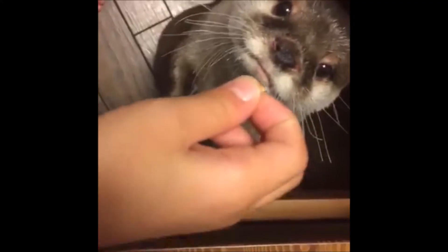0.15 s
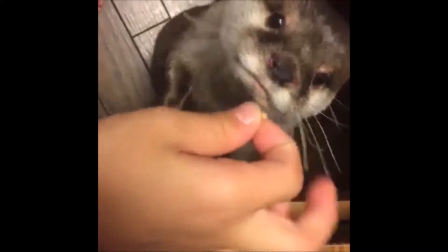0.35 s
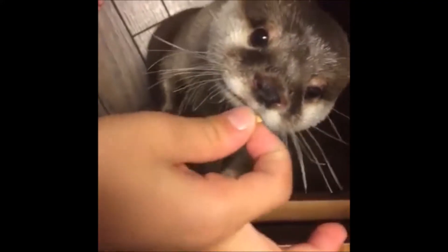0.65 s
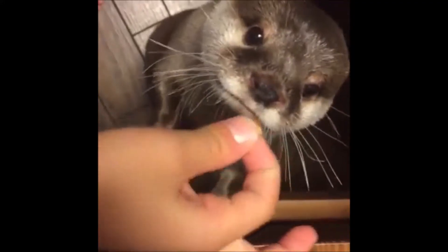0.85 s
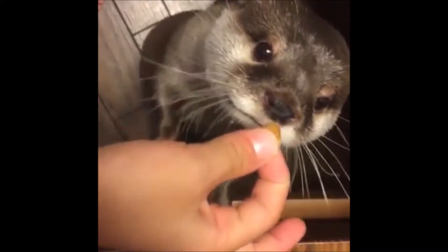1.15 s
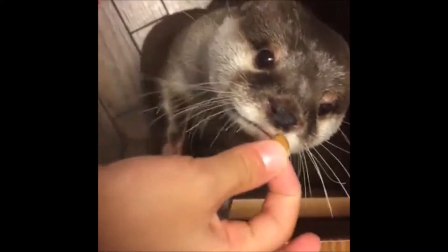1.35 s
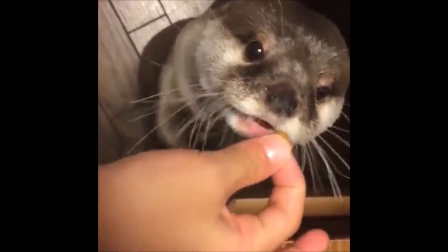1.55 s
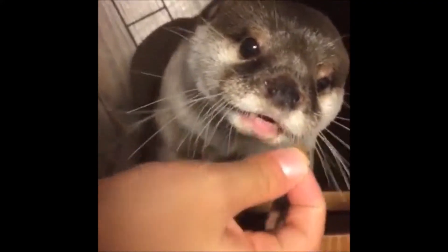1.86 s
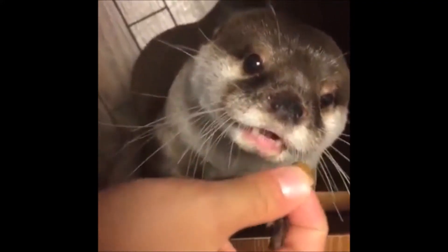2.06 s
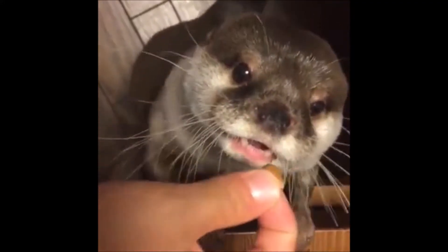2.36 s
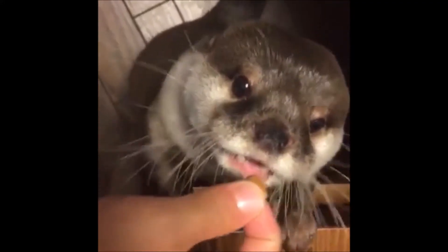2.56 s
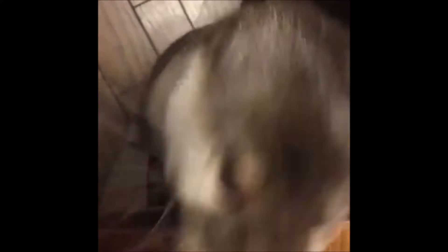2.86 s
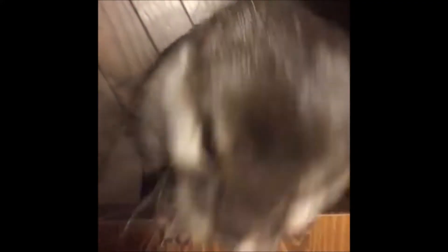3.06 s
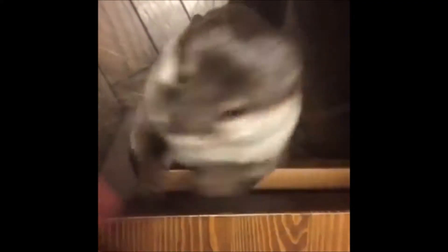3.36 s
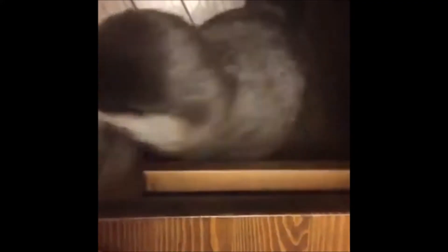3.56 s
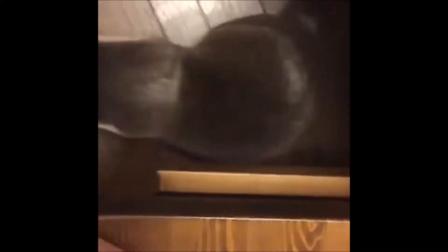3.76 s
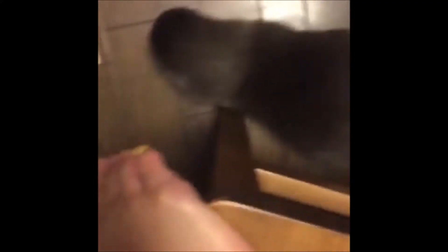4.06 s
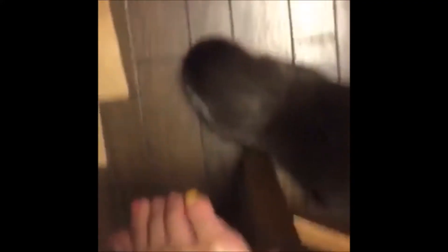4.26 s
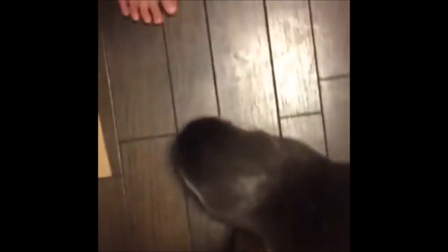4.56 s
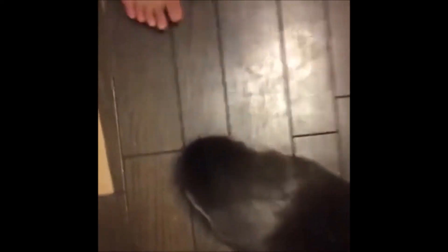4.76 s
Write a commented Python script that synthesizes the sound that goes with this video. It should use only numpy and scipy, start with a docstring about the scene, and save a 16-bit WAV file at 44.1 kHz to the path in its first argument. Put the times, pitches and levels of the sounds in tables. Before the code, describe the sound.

Over a faint indoor hum, close shrill otter calls break upward into a hoarse scream with paw thuds, ending in a low nasal grumble.

```python
"""Over a quiet hum, an earlier cry of a pet otter is dying away in a small room with a wooden floor.
The otter sniffs a morsel three times: short draughts of noise. Then it begs close to a phone: a wavering
cry breaks upward into a whine, a hoarse scream with paw thuds, and a wail, all pulses of the vocal folds
coloured by throat and mouth. A thin whistle joins the cry and the scream, and low lumps of air rumble.
Last, it walks off with a low nasal grumble and one more paw thud. The room rings a little."""
import sys
import numpy as np
from scipy import signal
from scipy.fft import rfft, irfft, next_fast_len
from scipy.io import wavfile
from scipy.ndimage import uniform_filter1d

SR = 44100
rng = np.random.default_rng(int(sys.argv[2]) if len(sys.argv) > 2 else 0)


def materialize(psi):
    """Save the field psi as 16-bit PCM at rate SR to the path in sys.argv[1].

    A 1-D psi becomes a single channel; in a 2-D psi each row is a channel.
    """
    bounded = np.clip(np.atleast_2d(psi).T, -1, 1)
    quanta = np.round(bounded * 32767).astype(np.int16)
    wavfile.write(sys.argv[1], SR, quanta)


N = 216220
TIME = np.arange(N) / SR  # [s]
EDGE_HZ = 14600  # upper limit of the sound


def amp(db):
    """Turns decibels into a gain."""
    return 10 ** (np.asarray(db) / 20)


def unit(x):
    """Scales a sound to an average strength (rms) of 1."""
    return x / np.sqrt(np.mean(x ** 2) + 1e-20)


def read(points, hz):
    """Reads a curve between its points, on a logarithmic frequency axis."""
    point_hz, value = np.transpose(points)
    return np.interp(np.log(hz + 1), np.log(point_hz + 1), value)


def follow(rows, t):
    """Reads every column of a curve at the times t."""
    s, *columns = np.transpose(rows)
    return [np.interp(t, s, column) for column in columns]


def add(mix, s, sound):
    """Mixes a sound in at time s, cutting what runs past the end."""
    part = mix[max(round(s * SR), 0):][:len(sound)]
    part += sound[:len(part)]


def shape(x, gain):
    """Filters by gain, a function of frequency."""
    size = next_fast_len(len(x) + 4096)
    spectrum = rfft(x, size) * gain(np.fft.rfftfreq(size, 1 / SR))
    return irfft(spectrum, size)[:len(x)]


def wander(count, hz):
    """Random drift of rms 1 that moves mostly slower than hz."""
    drift = shape(rng.standard_normal(N), lambda f: 1 / (1 + (f / hz) ** 4))
    return unit(drift[:count])


def resonate(x, hz, width):
    """A resonance of gain 1 whose centre follows the curve hz."""
    turn = np.exp(2j * np.pi * np.cumsum(hz) / SR)
    r = np.exp(-np.pi * width / SR)
    # shift the centre down to zero, smooth there, and shift back
    smooth = signal.lfilter([1 - r], [1, -r], x / turn)
    return 2 * (turn * smooth).real


def steady(x, size=700):
    """Holds the running rms near 1."""
    power = uniform_filter1d(uniform_filter1d(x ** 2, size), size)
    return x / np.sqrt(abs(power) + 1e-12)


# colour of the room noise: (frequency [Hz], relative level [dB])
ROOM_NOISE = [(15, -71.5), (25, -21.5), (101, -4), (167, -11.5), (237, -10), (427, -19.5), (488, -25.5),
              (573, -17.5), (769, -24), (1060, -21.5), (1960, -33.5), (3180, -36), (7480, -42.5),
              (12100, -48), (15000, -62)]
# steady tones of the hum: (frequency [Hz], relative level [dB])
HUM_TONES = [(102.3, -73), (532.9, -78.5), (581.4, -76)]


def background(start=0.044, noise_db=-59, hum_gain_db=3.5):
    """Low room noise with the wavering hum of a household appliance; both begin at start."""
    noise = unit(shape(rng.standard_normal(N), lambda f: amp(read(ROOM_NOISE, f))))
    noise = noise * amp(noise_db + 0.42 * wander(N, 11))
    hum = np.zeros(N)
    for hz, db in HUM_TONES:
        phase = 2 * np.pi * hz * TIME + 0.75 * wander(N, 1.9)
        hum += amp(db + hum_gain_db) * np.sqrt(2) * np.sin(phase)
    return (noise + hum) * (TIME > start)


# partials of an earlier cry: (frequency [Hz], relative level [dB], time to fade by 60 dB [s], capped below)
EARLIER_CRY = [(915, -7, 0.35), (1390, -13, 0.5), (1870, 3, 0.33), (2300, 3.5, 0.44), (3170, -13, 0.67),
               (3820, -18, 0.35), (4150, -12, 0.74), (5120, -11, 0.35), (6050, -6, 0.35), (6980, -10, 0.3)]


def echo(start=.052, ring_db=-50, haze_db=-57, longest_t60=0.47 + .14, haze_t60=0.47):
    """The partials and hiss of an earlier cry fade in the room, none outlasting the room itself."""
    t, first = TIME[:SR], SR // 20  # levels are set over the first twentieth of a second
    ring = np.zeros(SR)
    for hz, db, t60 in EARLIER_CRY:
        fade = amp(db - 60 * t / min(t60, longest_t60))
        tone = np.sin(2 * np.pi * (hz * t + rng.random()))
        ring += fade * tone * (1 + .5 * wander(SR, 44))
    haze = shape(rng.standard_normal(SR),
                 lambda f: amp(read(CRY_COLOUR, f)) * f / np.hypot(f, 5000))
    haze = haze * amp(-60 * t / haze_t60)
    out = np.zeros(N)
    add(out, start, amp(ring_db) * ring / ring[:first].std())
    add(out, start, amp(haze_db) * haze / haze[:first].std())
    return out


# air stirred by the lunge and the moving hand: (time [s], length [s], level [dB])
AIR_LUMPS = [(3.066, 0.073, -51.5), (4.057, 0.72, -59)]


def buffet(top_hz=45):
    """Stirred air rumbles on the microphone as soft lumps of low pressure."""
    out = np.zeros(N)
    for s, length, db in AIR_LUMPS:
        count = int(length * SR)
        add(out, s, amp(db) * wander(count, top_hz) * signal.windows.tukey(count, .4))
    return out


# paws landing on the wooden step: (time [s], peak level [dB])
PAW_LANDINGS = [(3.069, -45), (3.167, -42.5), (3.238, -33), (3.274, -39), (4.653, -48)]
# ways the wood rings: (frequency [Hz], relative level [dB], time to fade by 60 dB [s])
WOOD_RINGS = [(190, -25.5, 0.12), (320, 0.5, 0.13), (377, 12, 0.026), (440, -7.5, 0.017)]


def paws():
    """Soft pads thud on the wood: a short scuff of noise sets off its fading tones."""
    out, t = np.zeros(N), TIME[:SR // 8]
    wood = sum(amp(db - 60 * t / t60) * np.sin(2 * np.pi * hz * t) for hz, db, t60 in WOOD_RINGS)
    for s, db in PAW_LANDINGS:
        scuff = rng.standard_normal(len(t)) * np.exp(-t / 0.018)
        thud = signal.fftconvolve(scuff, wood)
        add(out, s, amp(db) * thud / abs(thud).max())
    return out


# how long the room rings: (frequency [Hz], time to fade by 60 dB [s])
ROOM_FADE = [(150, 0.38), (800, 0.57), (2500, 0.64), (6000, 0.74), (14000, 0.35)]


def room(x, tail_db, early_db):
    """Furniture scatters the short waves first; then a tail dies band by band."""
    # sparse random clicks, faded separately in each band, make the tail
    taps = rng.choice([-1., 1.], SR) * (rng.random(SR) < 4000 / SR) * (TIME[:SR] > .008)
    hz, t, bands = signal.stft(taps, SR, nperseg=256)
    fade = amp(-60 * t / read(ROOM_FADE, hz)[:, None])
    tail = signal.istft(bands * fade, SR, nperseg=256)[1]
    early = np.zeros(len(tail))
    early_s = rng.uniform(.002, .014, size=8)
    early[(early_s * SR).astype(int)] = rng.choice([-1., 1.], size=8)
    response = amp(tail_db) * tail / np.linalg.norm(tail)
    response = response + amp(early_db) * early / np.linalg.norm(early)
    reflected = signal.fftconvolve(x, response)[:N]
    return x + shape(reflected, lambda f: f / np.hypot(f, 900))  # less bass comes back


# sniffs at the food: (time [s], length [s], level before the room mix [dB])
SNIFF_TIMES = [(0.732, 0.13, -48.5), (1.091, 0.095, -59), (1.393, 0.082, -56)]
# colour of the nose: (frequency [Hz], relative level [dB])
NOSE_COLOUR = [(710, -25), (1200, -7), (1490, -12), (2010, -8.5), (2700, -19), (3990, -13.5), (5900, -19),
               (8640, -12.5), (13000, -18), (14000, -15.5)]


def sniffs():
    """Short soft draughts through the otter's nose: coloured noise that swells and sinks."""
    out = np.zeros(N)
    for s, length, db in SNIFF_TIMES:
        air = unit(shape(rng.standard_normal(N), lambda f: amp(read(NOSE_COLOUR, f))))
        count = int(length * SR)
        add(out, s, amp(db) * air[:count] * np.hanning(count))
    return out


# the voice strains or slackens: (time [s], half length [s], added roughness [0-1], effort [dB],
# bass [dB], treble [dB])
VOICE_STRAINS = [(1.68, .035, .85, 4, 7, -7), (1.95, .06, 0, 3, 0, -2.5), (2.15, .055, .55, 0, -1.5, -1),
                 (2.24, .025, 0, 0, -2, -5), (2.34, .05, 0, 2, -2, 1), (2.715, .025, 0, 4, 0, -4),
                 (2.79, .035, .25, -1, 1, 5), (2.92, .05, .5, 0, 0, 0), (3.064, .012, .3, 8, 7, -9),
                 (3.14, .05, .5, 1, -1, 7), (3.22, .018, .2, -4, -2, 0), (3.27, .022, .9, 3, -1, 0),
                 (3.345, .035, 0, 4, 3, -4), (3.51, .035, .5, 6, -1, -6), (3.84, .1, .35, -1, -3, 3),
                 (4.07, .05, 0, 4, 0, 0), (4.61, .09, .4, -4, -5, 6)]


def strain(t):
    """Roughness, effort, bass and treble that each passing strain adds, as smooth bumps in time."""
    return sum(np.outer(added, np.exp(-((t - s) / half) ** 2)) for s, half, *added in VOICE_STRAINS)


SWELL_DB, RELEASE_DB = 22, 30  # effort climbs this far at the start; the voice dies this far at the end
BASS_FOLLOWS, TREBLE_FOLLOWS = .1, .8  # share of effort that reaches the lowest and highest partials
# one mouth resonance glides once per phrase, by phrase name:
# (from [Hz], to [Hz], time midway [s], glide [s])
MOUTH_GLIDES = {"cry": (1870, 2810, 1.76, .025), "whine": (2220, 2640, 2.23, .05),
                "scream": (3220, 2020, 3.24, .035), "wail": (3650, 2490, 3.415, .015),
                "grumble": (2290, 2830, 4.3, .13)}


def controls(phrase, pitch, name):
    """Effort swells, fades as the air runs out and rises with pitch; bass and treble follow in part."""
    (start, end, swell, release, mouth_db, bass_db, treble_db,
     fade, treble_fade, push, rough) = phrase
    t = np.arange(start, end, 1 / SR)
    (hz,) = follow(pitch, t)
    hoarse, strain_db, chest_db, shrill_db = strain(t)
    semitones = 12 * np.log2(hz / np.median(hz))
    swell_db = SWELL_DB * np.maximum(1 - (t - start) / swell, 0)
    release_db = RELEASE_DB * np.maximum(1 - (end - t) / release, 0)
    effort_db = push * semitones + strain_db - swell_db
    bands_db = np.array([bass_db + BASS_FOLLOWS * effort_db + chest_db,
                         mouth_db + effort_db - fade * (t - start),
                         treble_db + TREBLE_FOLLOWS * effort_db + shrill_db - treble_fade * (t - start)])
    from_hz, to_hz, midway, glide = MOUTH_GLIDES[name]
    mouth_hz = from_hz + (to_hz - from_hz) * (1 + np.tanh((t - midway) / glide)) / 2
    return t, hz, np.clip(rough + hoarse, 0, 1), mouth_hz, amp(bands_db - release_db)


def throat_filter(x, points, size=4096):
    """Colours the voice so that each pulse rings only after it strikes."""
    hz = abs(np.fft.fftfreq(size, 1 / SR))
    log_gain = np.log(amp(np.maximum(read(points, hz), -80)))
    # the phase that belongs to this gain puts all the ringing after the strike
    response = np.fft.ifft(np.exp(np.conj(signal.hilbert(log_gain)))).real
    return signal.fftconvolve(x, response[:size // 2])[:len(x)]


# narrow bands missing from the voice: (frequency [Hz], width [Hz])
CAVITIES = [(8700, 337), (11900, 110), (12600, 220)]


def notches(f):
    """Side cavities of the nose and throat weaken narrow bands."""
    return np.prod([1 - 0.82 / (1 + ((f - hz) / width) ** 4) for hz, width in CAVITIES], axis=0)


def bounce(x, delay, sway, gain):
    """The floor's reflection shifts as the head moves, so upper partials swell and sink in turn."""
    index = np.arange(len(x))
    delay_samples = SR * (delay + sway * wander(len(x), 3.28))
    late = np.interp(index - delay_samples, index, x, left=0)
    return x + gain * shape(late, lambda f: f ** 2 / (f ** 2 + 1200 ** 2))


def vocal_folds(hz, turns, rough, rasp, doubling, buzz, buzz_hz, spread=.12):
    """The folds close gradually, so each pulse is spread over part of its cycle; hoarseness shakes it."""
    count = len(hz)
    pulses = np.zeros(count)
    for k in range(1, int(EDGE_HZ / hz.min()) + 1):
        pulses += np.cos(2 * np.pi * k * turns - spread * k * k) * (k * hz < SR / 2)
    # hoarse folds vary in strength, and alternate strong and weak cycles
    alternate = doubling * wander(count, 33) * np.cos(np.pi * turns)
    folds = unit(pulses) * (1 + rough * (rasp * wander(count, 310) + alternate))
    # a second vibration in the throat comes and goes, flanking each partial with side tones
    buzz_turns = np.cumsum(buzz_hz * (1 + .07 * wander(count, 25))) / SR
    buzz_depth = buzz * (1 + .6 * wander(count, 9))
    return folds * (1 + buzz_depth * np.cos(2 * np.pi * buzz_turns))


def voice(name, phrase, pitch, throat, jitter, jitter_hz, air, rasp, doubling, clean_hz, ring_db,
          ring_width, waver, rise, fall, reflect, buzz=0, buzz_hz=310):
    """Unsteady vocal-fold pulses and puffs of air pass the throat and the moving mouth."""
    t, hz, rough, mouth_hz, (bass_gain, middle_gain, treble_gain) = controls(phrase, pitch, name)
    count = len(t)
    # the pitch wavers a little, and more when hoarse
    hz = hz * (1 + waver * wander(count, 35) + jitter * rough * wander(count, jitter_hz))
    turns = np.cumsum(hz) / SR
    folds = vocal_folds(hz, turns, rough, rasp, doubling, buzz, buzz_hz)
    # air hisses through each opening of the folds and rivals the partials above clean_hz
    opening = 0.18 + np.exp(-(turns % 1) / 0.12)
    puffs = unit(opening * rng.standard_normal(N)[:count])
    drive = shape(folds, lambda f: .6 + .4 / (1 + (f / clean_hz) ** 10))
    drive += .55 * shape(puffs, lambda f: 1 - 1 / (1 + (f / clean_hz) ** 10))
    drive += air * rough * shape(puffs, lambda f: f / np.hypot(f, 3500))
    x = throat_filter(drive, throat)
    x = x + amp(ring_db) * resonate(x, mouth_hz, ring_width)
    x = bounce(shape(x, notches), delay=0.0012024, sway=.0001, gain=reflect)
    # effort shifts the power between the lowest partials, the mouth band and the treble
    bass = shape(x, lambda f: 1 / (1 + (f / 1400) ** 16))
    treble = shape(x, lambda f: 1 - 1 / (1 + (f / 4800) ** 24))
    middle = x - bass - treble
    x = bass_gain * steady(bass) + middle_gain * steady(middle) + treble_gain * steady(treble)
    ends = np.clip(np.minimum((t - t[0]) / rise, (t[-1] - t) / fall), 0, 1)
    out = np.zeros(N)
    add(out, t[0], np.sin(np.pi / 2 * ends) * x)
    return out


# grumble phrase, columns as in CRY_PHRASE
GRUMBLE_PHRASE = (3.77, 4.74, .028, .1, -38, -35.5, -55, 2, 1, .3, .19)
# grumble pitch before wavering: (time [s], pitch [Hz])
GRUMBLE_NOTES = [(3.79, 207.0), (3.822, 212.1), (3.918, 211.9), (3.95, 205.7), (4.078, 213.7),
                 (4.174, 202.0), (4.462, 195.5), (4.574, 179.9), (4.698, 180.2)]
# throat and mouth in the grumble: (frequency [Hz], relative level [dB])
GRUMBLE_COLOUR = [(120, -2.5), (200, 9.5), (400, 4), (610, -5), (800, -13), (1000, -1.5), (1400, -8),
                  (1750, -10), (2500, -18.5), (3800, -13), (5200, -33), (7400, -25.5), (9500, -25),
                  (13500, -36)]


def grumble():
    """A low nasal complaint as the otter turns away: slow fold pulses through a bassy throat."""
    return voice("grumble", GRUMBLE_PHRASE, GRUMBLE_NOTES, GRUMBLE_COLOUR,
                 jitter=.05, jitter_hz=107.7, air=2.4, rasp=0.087, doubling=0.049, clean_hz=7120,
                 ring_db=16, ring_width=300, waver=0.0054, rise=0.04, fall=0.012, reflect=0.5)


# thin whistles on the hardest pushes: (time [s], length [s], level before the room mix [dB])
WHISTLE_TIMES = [(1.726, 0.2, -23.5), (1.85, 0.23, -28), (3.06, 0.067, -21.5)]


def whistle(hz=5062, flutter=0.19):
    """The whistle keeps its pitch while the voice wavers under it; only its level flutters."""
    level = np.zeros(N)
    for s, length, db in WHISTLE_TIMES:
        add(level, s, amp(db) * signal.windows.tukey(int(length * SR), .15))
    return level * (1 + flutter * wander(N, 60)) * np.sqrt(2) * np.sin(2 * np.pi * hz * TIME)


# cry phrase, levels before the room mix: (start [s], end [s], swell [s], release [s], mouth band [dB],
# bass [dB], treble [dB], mouth band fade [dB/s], treble fade [dB/s], push [dB/semitone], roughness [0-1])
CRY_PHRASE = (1.675, 2.19, .065, .01, -11, -36.5, -18, 7, 20, 2, .025)
# cry pitch before wavering: (time [s], pitch [Hz])
CRY_NOTES = [(1.712, 477.4), (1.744, 583.9), (1.76, 563.1), (1.872, 563.0), (1.888, 518.1), (1.904, 566.3),
             (1.936, 541.2), (1.952, 559.8), (1.984, 536.9), (2.032, 565.5), (2.048, 542.3), (2.108, 535.2)]
# throat and mouth in the cry: (frequency [Hz], relative level [dB])
CRY_COLOUR = [(260, -55), (450, -18.5), (577, -25), (809, -5), (1090, -18), (1950, -6.5), (2620, 5),
              (2940, -12.5), (3950, 0), (4640, -9), (5700, -11), (7310, -22.5), (11200, -19.5),
              (12100, -35), (13500, -25.5), (15000, -53.5)]


def cry():
    """The first call: fold pulses through a narrow, clear mouth resonance."""
    return voice("cry", CRY_PHRASE, CRY_NOTES, CRY_COLOUR,
                 jitter=0.11, jitter_hz=162, air=1.0, rasp=1.0, doubling=0.13, clean_hz=14060,
                 ring_db=6.5, ring_width=190, waver=0.0084, rise=0.0019, fall=0.08, reflect=0.16,
                 buzz=.04, buzz_hz=190)


# whine phrase, columns as in CRY_PHRASE
WHINE_PHRASE = (2.125, 2.985, .04, .045, -17, -30, -28.5, 2, -4, 2.5, .09)
# whine pitch before wavering: (time [s], pitch [Hz])
WHINE_NOTES = [(2.2, 822.1), (2.344, 899.5), (2.36, 846.9), (2.408, 882.8), (2.424, 854.2), (2.488, 850.3),
               (2.504, 870.3), (2.568, 821.9), (2.584, 852.6), (2.648, 832.0), (2.664, 876.1),
               (2.872, 853.7), (2.92, 885.7), (2.948, 848.0)]
# throat and mouth in the whine: (frequency [Hz], relative level [dB])
WHINE_COLOUR = [(410, -50), (700, -6.5), (882, 2.5), (1120, -66.5), (1700, -6.5), (1980, -9.5), (2690, 0.5),
                (3060, -5.5), (3520, -2.5), (3800, -20), (4050, -4), (4380, 0), (4700, -7), (5060, -32),
                (5450, -7), (6100, -17), (8210, -22), (8870, -32), (10900, -16), (12400, -21),
                (15000, -41.5)]


def whine():
    """The folds jump to a higher register, with strong and weak cycles in turn."""
    return voice("whine", WHINE_PHRASE, WHINE_NOTES, WHINE_COLOUR,
                 jitter=.06, jitter_hz=172.7, air=0.09, rasp=0.7, doubling=1.0, clean_hz=5200,
                 ring_db=0.5, ring_width=690, waver=0.0058, rise=0.026, fall=0.0056, reflect=0.2,
                 buzz=.13)


# scream phrase, columns as in CRY_PHRASE
SCREAM_PHRASE = (3.045, 3.39, .012, .005, -13, -24.5, -24, 10, 26, .1, .1)
# scream pitch before wavering: (time [s], pitch [Hz])
SCREAM_NOTES = [(3.05, 672.3), (3.08, 1042), (3.088, 1015), (3.158, 1007), (3.188, 1150), (3.266, 1030),
                (3.29, 1128), (3.38, 1004)]
# throat and mouth in the scream: (frequency [Hz], relative level [dB])
SCREAM_COLOUR = [(290, -71), (500, -16.5), (1060, -4.5), (1540, -17), (2130, 1), (2640, -6.5), (3130, -4),
                 (3770, -14), (4250, -5), (5160, -15.5), (5700, -11), (6760, -10), (8730, -13),
                 (9380, -9.5), (12300, -14), (15000, -26.5)]


def scream():
    """The highest, hoarse call: rough fold pulses through a strong, wide mouth resonance."""
    return voice("scream", SCREAM_PHRASE, SCREAM_NOTES, SCREAM_COLOUR,
                 jitter=.1, jitter_hz=140.7, air=0.56, rasp=0.4, doubling=0.72, clean_hz=6600,
                 ring_db=14, ring_width=1100, waver=0.0071, rise=0.0066, fall=0.023, reflect=0.71,
                 buzz=.15)


# wail phrase, columns as in CRY_PHRASE
WAIL_PHRASE = (3.375, 3.605, .004, .085, -13, -25.5, -27, 45, 28, .5, .12)
# wail pitch before wavering: (time [s], pitch [Hz])
WAIL_NOTES = [(3.385, 918.2), (3.465, 823.8), (3.487, 849.9), (3.547, 787.5), (3.575, 677.4)]
# throat and mouth in the wail: (frequency [Hz], relative level [dB])
WAIL_COLOUR = [(410, -27), (700, -17), (882, 2.5), (1030, -13), (1200, -6.5), (1590, -5), (2140, 7),
               (4270, -3), (5040, -21.5), (6270, -7), (6770, -13.5), (8750, -19.5), (9950, -18),
               (12200, -17), (15000, -24)]


def wail():
    """The pitch sinks and the voice fades fast, with a strong floor reflection."""
    return voice("wail", WAIL_PHRASE, WAIL_NOTES, WAIL_COLOUR,
                 jitter=0.067, jitter_hz=194.3, air=0.6, rasp=0.64, doubling=1.0, clean_hz=13000,
                 ring_db=-0.5, ring_width=1200, waver=0.0024, rise=0.017, fall=0.0063, reflect=0.97)


def cries():
    """The loud calls, facing the microphone; the voice jumps from one register to the next."""
    return cry() + whine() + scream() + wail() + whistle()


def scene():
    """The quiet room, a more distant grumble and the near cries, the same in both channels."""
    mono = background() + echo() + buffet() + paws()
    mono += amp(1.64) * room(grumble(), tail_db=-11, early_db=2)
    mono += amp(-2.76) * room(cries() + sniffs(), tail_db=-18.5, early_db=-6.5)
    return np.array([mono, mono])


def record(dry):
    """The phone rounds off the highest peaks, then cuts everything above the upper limit."""
    rounded = dry / (1 + (dry / .9) ** 8) ** (1 / 8)
    low_pass = signal.firwin(401, EDGE_HZ, window=("kaiser", 9), fs=SR)
    return signal.oaconvolve(rounded, low_pass[None], "same")


dry = scene()
out = record(dry)
materialize(out)
```